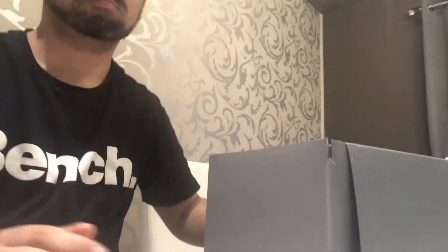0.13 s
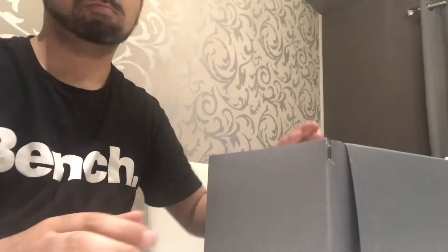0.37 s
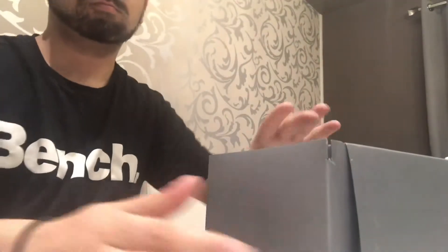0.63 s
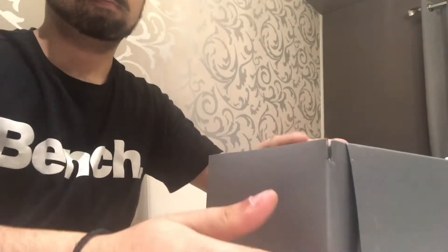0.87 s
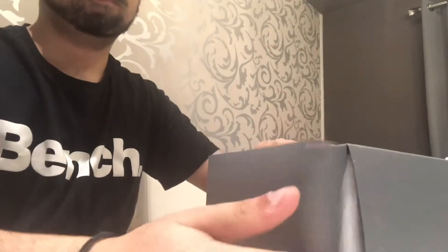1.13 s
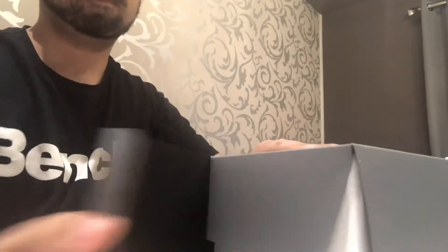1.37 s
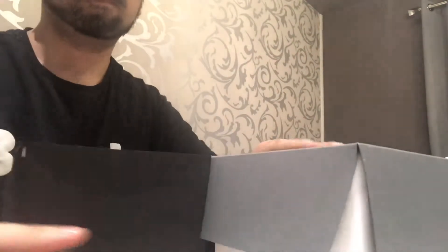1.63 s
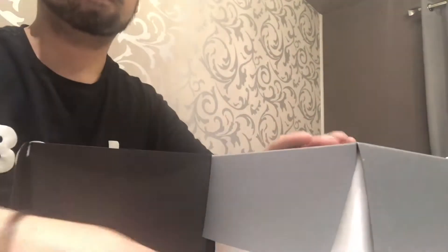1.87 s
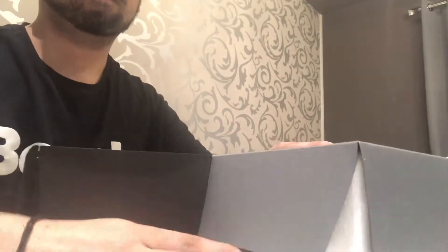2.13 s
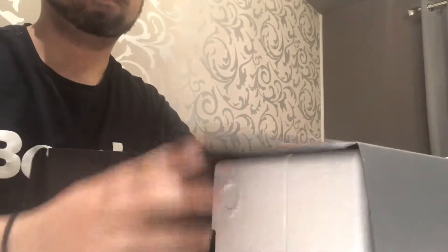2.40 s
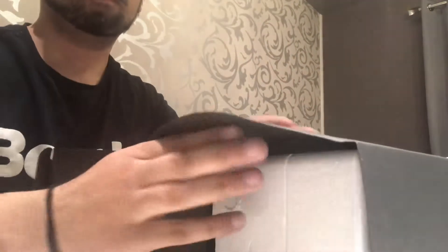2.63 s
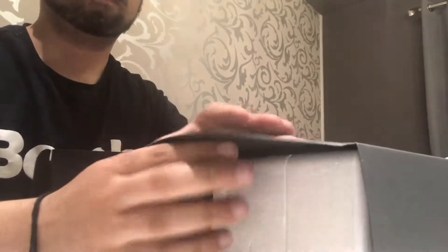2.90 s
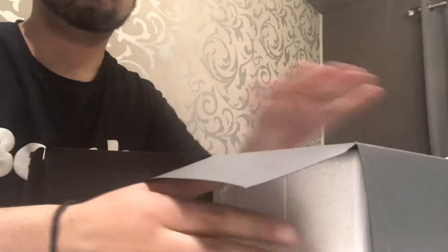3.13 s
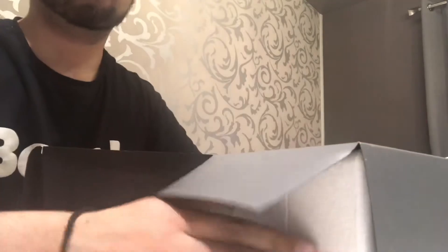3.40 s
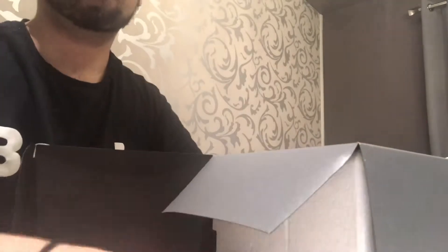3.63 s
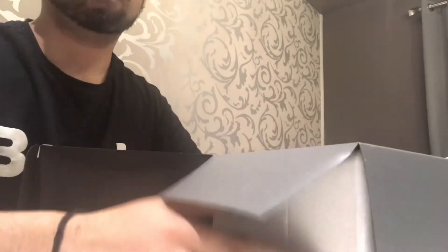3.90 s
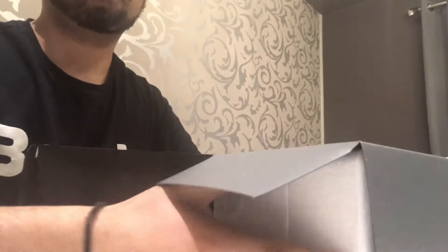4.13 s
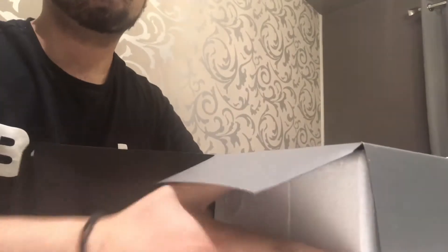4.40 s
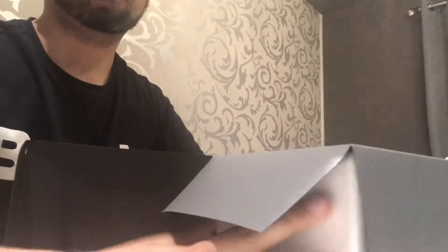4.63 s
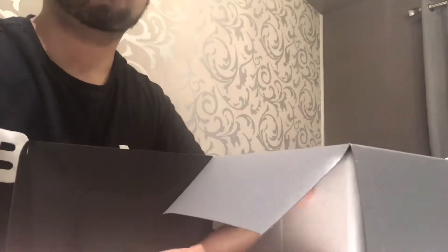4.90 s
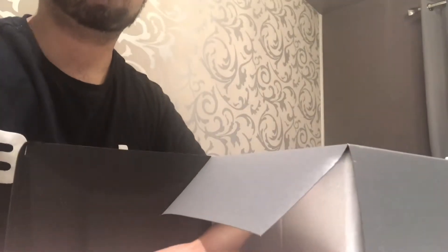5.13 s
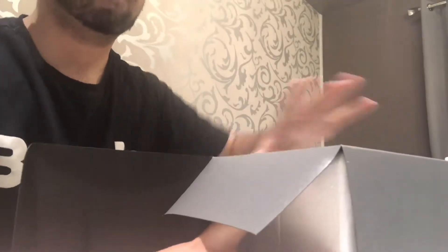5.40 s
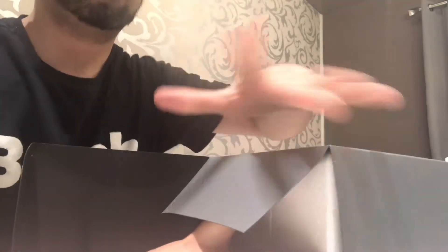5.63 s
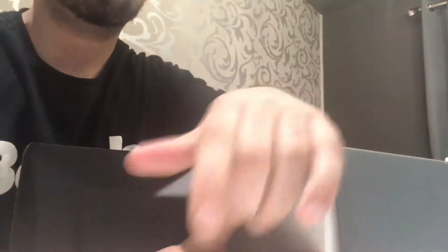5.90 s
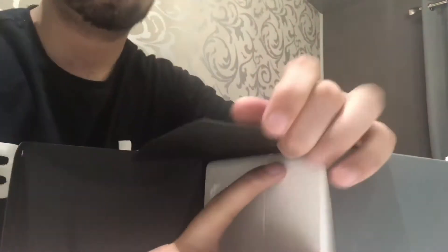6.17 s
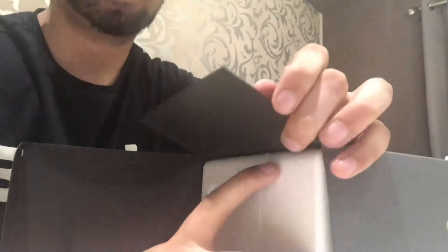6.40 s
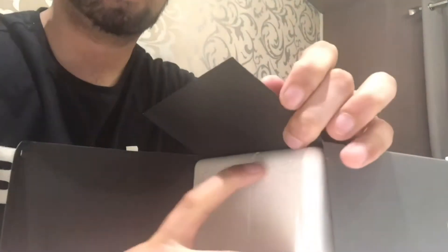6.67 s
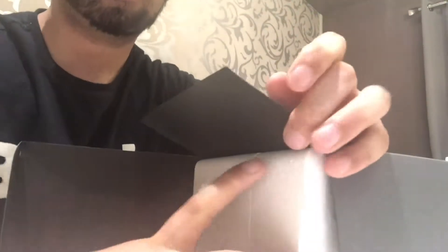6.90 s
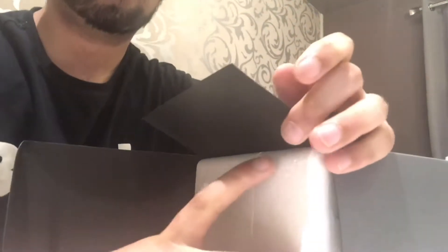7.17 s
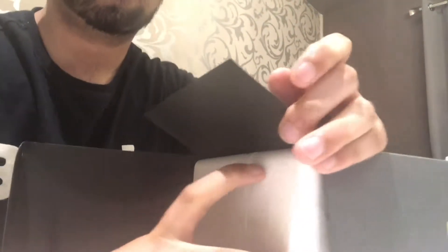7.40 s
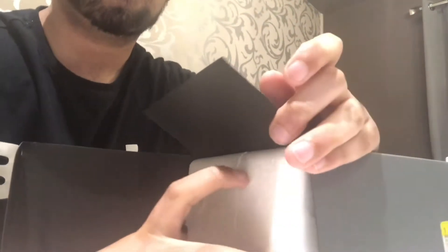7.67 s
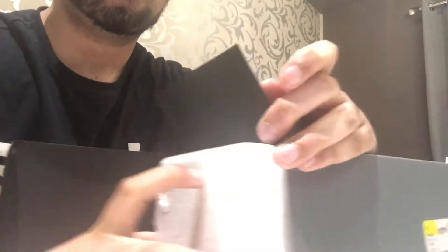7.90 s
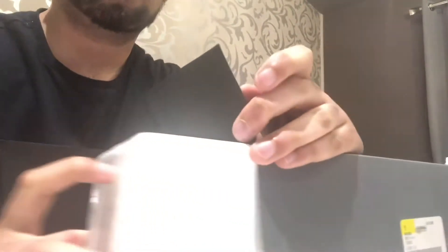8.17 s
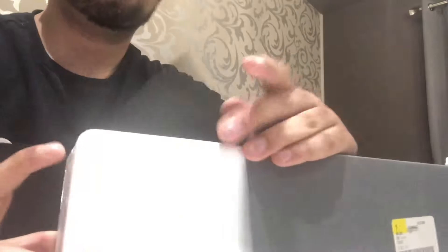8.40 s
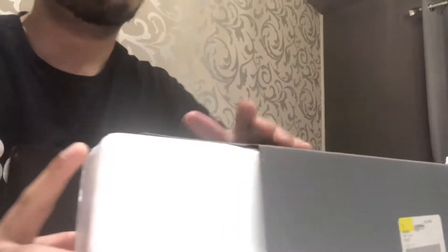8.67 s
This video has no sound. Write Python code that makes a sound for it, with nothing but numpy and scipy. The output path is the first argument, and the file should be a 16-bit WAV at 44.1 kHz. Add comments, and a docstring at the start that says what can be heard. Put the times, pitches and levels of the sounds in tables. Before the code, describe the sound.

Dry, close indoor handling of a stiff carton: skin and card rub in grainy strokes, panels thump and knock hollowly, edges squeak briefly. Midway a quiet run of creaky ticks leads to one bright, loud snap. Vigorous scuffing follows, then foam packing is pulled out in a sustained airy scrape, ending with a small knock and a fading rustle. Faint steady room air and a short room tail lie behind.

```python
"""A quiet room: hands open the flaps of a cardboard box and slide a foam block out, close to one microphone.
Skin, card and foam rub in dense random grains that hiss and shake the resonant box panels.
Knocks ring the panels after a falling chirp; snaps and creaks are short noise bursts; dragged edges squeak.
A short room tail and steady air noise lie behind; a faint, thin squeal wavers before the hands land."""
import sys
import numpy as np
from scipy import signal
from scipy.fft import rfft, irfft
from scipy.io import wavfile

SR = 44100
rng = np.random.default_rng(int(sys.argv[2]) if len(sys.argv) > 2 else 0)


def voltage_ratio(level):
    """Linear amplitude factor for a level in decibels (scalar or array-like)."""
    return 10 ** (np.asarray(level, float) / 20)


def generate_wav(sig):
    """Save sig (samples, or channels by samples) to the path in sys.argv[1] as 16-bit PCM at SR."""
    pcm = np.round(np.clip(np.atleast_2d(sig).T, -1, 1) * 32767).astype(np.int16)
    wavfile.write(sys.argv[1], SR, pcm)


N = 387638


def rms_one(x):
    """Scale to rms 1."""
    return x / np.sqrt(np.mean(x ** 2) + 1e-20)


def in_time(rows):
    """Columns of a table as curves over the samples."""
    time_s, *columns = np.transpose(rows)
    return [np.interp(np.arange(N) / SR, time_s, c) for c in columns]


def at_hz(points, hz):
    """Read a spectrum on a log-frequency axis."""
    point_hz, level_db = np.transpose(points)
    return np.interp(np.log(hz), np.log(point_hz), level_db)


def drift(rate_hz):
    """Smooth random curve of rms 1: noise through a double low-pass at SR / 20."""
    r = np.exp(-40 * np.pi * rate_hz / SR)
    noise = rng.standard_normal(N // 20 + 2002)
    slow = signal.lfilter([1], [1, -2 * r, r * r], noise)[2000:]
    return np.interp(np.arange(N) / 20, np.arange(len(slow)), rms_one(slow))


def ring(x, hz, t60_s):
    """Two-pole resonator: a unit click starts a decaying sine of height 1."""
    r, w = voltage_ratio(-60 / (t60_s * SR)), 2 * np.pi * hz / SR
    return signal.lfilter([0, np.sin(w)], [1, -2 * r * np.cos(w), r * r], x + 1e-18)


def band_limit(x, order, hz, kind):
    """Butterworth filter."""
    return signal.sosfilt(signal.butter(order, hz, kind, fs=SR, output="sos"), x)


def grains(per_s, spread_db):
    """Tiny slips of random size at random moments; rms 1."""
    sizes = voltage_ratio(spread_db * np.minimum(rng.exponential(1, N), 5)) * rng.standard_normal(N)
    return rms_one(sizes * (rng.random(N) < per_s / SR))


def coloured(sources, spectrum, lift_db, patchy_db):
    """Flickering third-octave bands of two alternating sources; lift_db is reached at 12 kHz from 0 at 3 kHz."""
    edges_hz = 25 * 2 ** np.arange(0, 9.5, 1 / 3)
    out = 0
    for k, (low, high) in enumerate(zip(edges_hz, edges_hz[1:])):
        hz = np.sqrt(low * high)
        band = band_limit(sources[k % 2], 2, [low, high], "band")
        treble = max(np.log2(hz / 3000) / 2, 0)
        out = out + band * voltage_ratio(at_hz(spectrum, hz) + patchy_db * drift(13.5) + lift_db * treble)
    return out


# hands, flaps and foam slide along the card: (top speed at [s], speeding up [s], slowing down [s],
# hiss [dB], top-octave lift [dB], panels [dB])
SLIDES = [(1.40, 0.13, 0.19, -51, -0.5, -50.5), (1.88, 0.16, 0.51, -50.5, 6.5, -83),
          (2.60, 0.23, 0.19, -47.5, 2.5, -44.5), (2.93, 0.45, 0.23, -61.5, 5, -61),
          (3.30, 0.26, 0.058, -49.5, 4, -59), (3.58, 0.42, 0.17, -53, 4.5, -51.5),
          (3.84, 0.11, 0.19, -48.5, 12, -58), (4.18, 0.21, 0.13, -47, 4.5, -48.5),
          (4.42, 0.09, 0.58, -49, 11.5, -51.5), (4.62, 0.21, 0.5, -60, 16.5, -69),
          (4.84, 0.037, 0.093, -52.5, 4, -78), (5.03, 0.1, 0.16, -52, 2, -54.5),
          (5.25, 0.16, 0.14, -54.5, 4.5, -58), (5.50, 0.54, 0.075, -63, -2, -49.5),
          (5.95, 0.12, 0.14, -50.5, 9.5, -50), (6.22, 0.085, 0.12, -48, 2, -52.5),
          (6.44, 0.12, 0.076, -45.5, -0.5, -47.5), (6.68, 0.25, 0.18, -41, 2.5, -46),
          (7.03, 0.094, 0.12, -47, 10, -50.5), (7.188, 0.04, 0.016, -44.5, 2, -47),
          (7.30, 0.49, 0.15, -75, -7, -52.5), (7.55, 0.13, 0.057, -47.5, 2, -48),
          (8.68, 0.31, 0.18, -50, 5, -54.5)]
# brushes of a finger or an edge: (top speed at [s], slowing down [s], hiss [dB], top-octave lift [dB],
# panels [dB])
BRUSHES = [(0.876, 0.071, -53.5, -0.5, -55.5), (1.014, 0.016, -52, -5, -73),
           (1.193, 0.047, -44.5, -1.5, -48), (1.245, 0.036, -45, 0.5, -42),
           (1.637, 0.084, -53.5, -0.5, -50), (1.93, 0.057, -45.5, 0.5, -42), (2.114, 0.043, -49.5, 4, -47),
           (2.198, 0.03, -53, 9, -66), (2.323, 0.027, -51, 5, -59), (2.414, 0.021, -46.5, 5, -47),
           (2.819, 0.046, -61.5, 6.5, -45), (4.032, 0.15, -52, -16, -44), (4.717, 0.049, -44, 6, -39.5),
           (5.561, 0.043, -60, 8, -46), (6.089, 0.055, -44.5, 7.5, -50), (6.85, 0.094, -51.5, 3.5, -47.5),
           (7.503, 0.0057, -34, -1, -46), (8.50, 0.081, -56, -8, -46)]
# the foam block is drawn out in one pull: (time [s], hiss [dB])
FOAM_PULL = [(7.68, -69), (7.716, -50), (7.794, -40), (8.08, -36.5), (8.328, -37.5), (8.386, -42),
             (8.44, -66)]
FOAM_LIFT_DB, FOAM_PANELS_RE_HISS_DB = 8.5, -10.5
HANDS_ON_S = 0.85
RESTING_HISS_DB, RESTING_LIFT_DB, RESTING_PANELS_DB = -64, 2, -60   # hands never lie quite still
BRUSH_RISE_MAX_S = 0.03
LIFT_DB_PER_HISS_DB = 0.26   # slower is duller


def strokes():
    """Quarter-sine speed of each stroke sets hiss, brightness and panel shaking; powers add."""
    t = np.arange(0, N / SR + .004, .002)
    brushes = [(s, min(BRUSH_RISE_MAX_S, fall), fall, *rest) for s, fall, *rest in BRUSHES]
    s, rise_s, fall_s, hiss_db, lift_db, panels_db = np.array(list(SLIDES) + brushes).T[:, :, None]
    before, after = (s - t) / np.maximum(rise_s, 1e-3), (t - s) / np.maximum(fall_s, 1e-3)
    away = np.where(t < s, before, after)
    speed = np.cos(np.pi / 2 * np.minimum(away, 1)) + 1e-3
    on = (t > HANDS_ON_S) + 1e-4

    hiss = (voltage_ratio(hiss_db) * speed) ** 2
    resting = voltage_ratio(RESTING_HISS_DB) ** 2
    foam = voltage_ratio(np.interp(t, *np.transpose(FOAM_PULL), left=-np.inf, right=-np.inf)) ** 2
    total = hiss.sum(axis=0) + resting + foam

    lift_db = lift_db + LIFT_DB_PER_HISS_DB * 20 * np.log10(speed)
    lift_sum = (hiss * lift_db).sum(axis=0) + resting * RESTING_LIFT_DB + foam * FOAM_LIFT_DB
    top_db = lift_sum / total   # power-weighted mean

    panels = ((voltage_ratio(panels_db) * speed) ** 2 * (away < 1)).sum(axis=0)
    panels = panels + voltage_ratio(RESTING_PANELS_DB) ** 2 + foam * voltage_ratio(FOAM_PANELS_RE_HISS_DB) ** 2
    return in_time(np.transpose([t, 10 * np.log10(total * on), top_db, 10 * np.log10(panels * on)]))


# box panels and cavity when struck: (mode [Hz], level [dB], t60 [s])
BOX = [(66, -15, 0.049), (140, -5, 0.12), (205, -1, 0.094), (267, 5, 0.05), (390.5, 14.5, 0.032),
       (459, 16.5, 0.015), (585, 20.5, 0.014), (766, 18, 0.012), (992, 12, 0.039), (1760, 9.5, 0.011),
       (2680, 7, 0.046)]
# relative spectrum of friction: (frequency [Hz], density [dB per Hz])
FRICTION = [(290, -30), (500, -7), (1460, -2), (2420, -1.5), (4300, -4), (14900, -18), (15800, -12)]
CARD_RE_HISS_DB, CARD_DB_PER_LIFT_DB = -8, 0.97   # dull card-on-card strokes ring most
FLAPS_DONE_S, FLAPS_DONE_LOSS_DB = 4.7, 4   # once the flaps are done, strokes ring the card less
CRACKLES_PER_S, CRACKLE_DB = 200, -6.5   # relative to the fine grains
RUMBLE_DB, RUMBLE_FOLLOWS, RUMBLE_HZ = -62.5, 0.4, 98.5   # at panels -52 dB; share of their swing


def rubbing():
    """Fine grains hiss, also through patch and card resonances; coarser slips drive the panel modes."""
    hiss_db, top_db, panels_db = strokes()
    # the grip catches and lets go, most in slow, soft strokes
    stutter_db = np.clip((-42 - hiss_db) / 4, .8, 1.7) * drift(25)

    fine = [grains(12000, spread_db=0.0) for k in range(2)]
    patch = sum(voltage_ratio(7 * drift(6)) * rms_one(ring(fine[0], hz, .018))
                for hz in np.geomspace(1000, 13000, 24))
    # the upper card modes sing along, damped
    card = sum(voltage_ratio(db / 2 + 5.8 * drift(2.1)) * rms_one(ring(fine[1], hz, 0.32 * t60))
               for hz, db, t60 in BOX if hz > 900)
    flaps_done = np.arange(N) > FLAPS_DONE_S * SR
    card_db = CARD_RE_HISS_DB - CARD_DB_PER_LIFT_DB * top_db - FLAPS_DONE_LOSS_DB * flaps_done
    crackle = voltage_ratio(CRACKLE_DB) * grains(CRACKLES_PER_S, spread_db=-1.0)   # dense and fine
    resonant = voltage_ratio(card_db) * rms_one(card) + voltage_ratio(-12) * rms_one(patch)
    hiss = coloured([f + crackle + resonant for f in fine], FRICTION, top_db, patchy_db=1.25)
    hiss = hiss / np.std(band_limit(hiss, 4, [1500, 6000], "band"))

    coarse = signal.lfilter([1], [1, -.9], grains(1500, spread_db=1.8))
    panels = sum(voltage_ratio(db + 3 * drift(4)) * ring(coarse, hz, .8 * t60) for hz, db, t60 in BOX if hz > 100)
    panels = rms_one(band_limit(panels, 2, 160, "high"))
    # the box rocks on the table
    rumble_db = RUMBLE_DB + RUMBLE_FOLLOWS * (panels_db + 52) + 2.9 * drift(3.6)
    rumble = voltage_ratio(rumble_db) * rms_one(ring(coarse, RUMBLE_HZ, 0.054))
    shaking = voltage_ratio(panels_db + stutter_db + 2.23 * drift(5.8)) * panels
    return rumble + voltage_ratio(hiss_db + stutter_db) * hiss + shaking


def favour_db(mode_hz, spot_hz):
    """Modes near the pitch that the struck spot favours ring louder."""
    return 18 * np.exp(-(np.log2(mode_hz / spot_hz) / 0.44) ** 2)


def card_spreading(hz):
    """Bending waves in card carry highs faster: delay falls as one over root of pitch."""
    return np.exp(-2j * np.pi * (.26 * np.sqrt(hz) - .001 * hz))


# fingers and flaps knock the box: (time [s], peak [dB], contact hardness [0-1.2], favoured pitch [Hz])
KNOCKS = [(1.246, -17, 1.05, 992), (1.904, -27.5, 1, 1000), (2.113, -31, 0.17, 320),
          (2.797, -32, 0.26, 427), (2.836, -36, 0.07, 212), (3.036, -34, 1, 302), (3.296, -33, 0.4, 555),
          (3.77, -35.5, 1.1, 496), (3.978, -33.5, 0.7, 560), (4.015, -24.5, 1, 585),
          (4.6582, -19.5, 0.68, 354), (4.743, -24, 0.9, 382), (5.977, -33, 0.53, 315),
          (6.342, -28, 0.4, 460), (6.705, -26, 1.19, 895), (7.028, -21, 1.1, 485), (7.185, -24.5, 0.6, 302),
          (7.459, -27, 1.19, 620), (7.481, -28, 1.19, 730), (8.165, -25.5, 1, 395), (8.515, -29, 1.1, 804)]


def knocks():
    """Each blow arrives as a falling chirp, then the panels ring; harder contacts are brighter."""
    out, size = np.zeros(N + 16384), 16384
    hz = np.fft.rfftfreq(size, 1 / SR) + 1
    click = np.arange(size) == 0
    luck_db = rng.normal(0, 2.5, (len(KNOCKS), len(BOX)))
    for (s, db, hard, spot_hz), gains_db in zip(KNOCKS, luck_db):
        gains_db = gains_db + favour_db(np.array(BOX)[:, 0], spot_hz)
        contact_hz = 150 * 2 ** (5 * np.clip(hard, 0, 1.2))
        rings = sum(voltage_ratio(mode_db + g) * ring(click, mode_hz, t60)
                    for (mode_hz, mode_db, t60), g in zip(BOX[2:], gains_db[2:]))
        soft = 1 / (1 + 1j * hz / contact_hz) ** 2 * hz / (hz + 120)
        blow = irfft((rfft(rings) * voltage_ratio(12.0) + 1) * card_spreading(hz) * soft, size)
        at = round(s * SR)
        out[at:at + size] += voltage_ratio(db) * blow / np.abs(blow).max()
    return out[:N]


# the whole box is pushed: (time [s], rms of first 50 ms [dB], favoured pitch [Hz])
THUDS = [(1.661, -50.5, 140), (1.907, -41, 66), (3.042, -51, 125), (4.66, -49, 111), (6.333, -43.5, 140)]


def thuds():
    """A push rings the two lowest box modes, softened."""
    out, size = np.zeros(N + 16384), 16384
    hz = np.fft.rfftfreq(size, 1 / SR) + 1
    click = np.arange(size) == 0
    for s, db, push_hz in THUDS:
        rings = sum(voltage_ratio(mode_db + favour_db(mode_hz, push_hz)) * ring(click, mode_hz, t60)
                    for mode_hz, mode_db, t60 in BOX[:2])
        soft = 1 / (1 + 1j * hz / 110) ** 2 / (1 + (50 / hz) ** 4)
        thud = irfft(rfft(rings) * card_spreading(hz) * soft, size)
        at = round(s * SR)
        out[at:at + size] += voltage_ratio(db) * thud / np.std(thud[:SR // 20])
    return out[:N]


# creases and beads let go: (time [s], peak [dB], brightness [dB per octave], length scale [s],
# strongest pitch [Hz])
SNAPS = [(1.196, -29, -3.5, 0.0068, 2620), (1.248, -14.5, -7, 0.0061, 2600), (1.527, -33, -8, 0.0083, 2850),
         (1.893, -15.5, -2, 0.0019, 4200), (1.907, -24, -7, 0.007, 2420), (2.092, -26, -1.5, 0.0082, 2520),
         (3.666, -22.5, -2, 0.0021, 5200), (4.016, -23.5, -7.5, 0.0038, 2640),
         (4.745, -27.5, -1, 0.0075, 2500), (5.911, -8.5, 2, 0.0027, 3940), (6.722, -23, -4.5, 0.0016, 930),
         (6.89, -23, -3.5, 0.0033, 5060), (7.18, -27.5, -1, 0.015, 1190), (7.47, -23, -14, 0.00078, 2800),
         (8.473, -27.5, -6, 0.0078, 1440)]
# a bent flap creaks in short ticks: (time [s], peak [dB], brightness [dB per octave])
CREAKS = [(0.926, -36.5, -9.5), (1.575, -35, -8), (5.232, -33, -9), (5.25, -35, -8), (5.29, -32.5, -9.5),
          (5.3767, -34, -7), (5.407, -37, -6.5), (5.451, -32.5, -11), (5.4735, -31.5, -7.5),
          (5.491, -46, -9), (5.504, -37, -9.5), (5.5518, -27.5, -9), (5.569, -35.5, -8.5), (5.582, -35, -5),
          (5.6107, -34, -7.5), (5.6795, -46.5, -1), (5.691, -50.5, -5.5), (5.7154, -34.5, -11.5),
          (5.733, -49.5, -7), (5.8023, -42, -8), (6.142, -35, -7), (6.984, -31, -10), (7.361, -32, -8),
          (7.373, -38, -9.5), (7.459, -22, -8), (7.482, -29, -1), (8.549, -28, -3)]
CREAK_LENGTH_SCALE_S, CREAK_HZ = 0.0031, 9100


def snaps():
    """Brief noise bursts, dull or bright; the fold that lets go has a pitch of its own."""
    out, size = np.zeros(N + 4096), 4096
    t, hz = np.arange(size) / SR, np.fft.rfftfreq(size, 1 / SR) + 1
    events = list(SNAPS) + [(*creak, CREAK_LENGTH_SCALE_S, CREAK_HZ) for creak in CREAKS]
    noises = rng.standard_normal((len(events), size))
    for (s, db, tilt_db, length_s, peak_hz), noise in zip(events, noises):
        age = t / max(0.45 * length_s, 1e-4)
        burst = noise * age ** 0.68 * np.exp(-age)
        slope = voltage_ratio(tilt_db * np.log2(np.clip(hz, 1000, 14000) / 3000))
        hump = voltage_ratio(8.5 * np.exp(-(np.log2(hz / peak_hz) / 0.75) ** 2)) / (1 + (hz / 15000) ** 8)
        burst = irfft(rfft(burst) * slope * hump * hz / (hz + 700), size)
        at = round(s * SR)
        out[at:at + size] += voltage_ratio(db) * burst / np.abs(burst).max()
    return out[:N]


# a flap edge squeaks as it drags: (time [s], rms at the height [dB])
SQUEAKS = [(1.01, -53.5), (1.1, -57), (1.66, -53), (3.58, -48)]
SQUEAK_HALF_WIDTH_S = 0.042   # to 1/e


def squeaks():
    """Coarse slips keep the highest card mode singing during each drag."""
    t, (hz, _, t60_s) = np.arange(0, N, 64) / SR, BOX[-1]
    drag = sum(voltage_ratio(db) * np.exp(-((t - s) / SQUEAK_HALF_WIDTH_S) ** 2) for s, db in SQUEAKS)
    tone = rms_one(ring(grains(900, spread_db=4.5), hz, t60_s / 2))
    return np.interp(np.arange(N) / SR, t, drag) * tone


# a very faint, thin squeal wavers before the hands land: (time [s], pitch [Hz])
SQUEAL = [(0.065, 13650), (0.14, 12750), (0.23, 12600), (0.32, 13700), (0.38, 13150), (0.48, 13650),
          (0.545, 13050)]
SQUEAL_DB = -79   # peak, before flicker
UPPER_RATIO, UPPER_DB, UPPER_DB_PER_KHZ, UPPER_ENDS_S = 1.105, -73, 20, 0.41   # level at highest pitch


def squeal():
    """Two thin gliding tones flicker in strength; the upper joins when the pitch is high."""
    hz, = in_time(SQUEAL)
    t, phase = np.arange(N) / SR, 2 * np.pi * np.cumsum(hz) / SR
    upper_db = UPPER_DB + UPPER_DB_PER_KHZ * (hz - hz.max()) / 1000
    upper = voltage_ratio(upper_db) * (t < UPPER_ENDS_S) * np.sin(UPPER_RATIO * phase)
    lower = voltage_ratio(SQUEAL_DB) * np.sin(phase) * (t < SQUEAL[-1][0])
    return voltage_ratio(2 * drift(20)) * (lower + upper)


def room(x):
    """A dense tail of reflections from near walls and furniture, dulled by them."""
    t60_s, build_up_s, wall_cut_hz = 0.42, 0.0096, 1800
    t = np.arange(SR // 2) / SR
    tail = rng.standard_normal(len(t)) * voltage_ratio(-60 * t / t60_s) * np.minimum(t / build_up_s, 1)
    tail = band_limit(tail, 1, wall_cut_hz, "low")
    return signal.fftconvolve(x, tail / np.linalg.norm(tail))[:N]


# relative spectrum of room air: (frequency [Hz], density [dB per Hz])
QUIET = [(25, -49), (38, -3), (69, -12), (327, -12), (759, -25), (3500, -32.5), (13000, -40)]
QUIET_RMS_DB = -65.5


def room_air():
    """Steady noise in gently flickering bands."""
    noise = rng.standard_normal((2, N))
    return voltage_ratio(QUIET_RMS_DB) * rms_one(coloured(noise, QUIET, 0, patchy_db=2.5))


def scene():
    """One microphone feeds both channels."""
    box = rubbing() + knocks() + thuds() + snaps() + squeaks()
    room_db = -19.5
    return np.tile(box + voltage_ratio(room_db) * room(box) + room_air() + squeal(), (2, 1))


def low_pass(x):
    """Removes everything above the highest recorded frequency."""
    return signal.sosfilt(signal.butter(12, 17060, fs=SR, output="sos"), x)


def record(dry):
    """Filters cut the deep bass and the very top."""
    cut = band_limit(dry, 4, 42, "high")
    cut = signal.sosfilt(signal.cheby2(12, 40, 16100, fs=SR, output="sos"), cut)
    return low_pass(cut)


dry = scene()
out = record(dry)
generate_wav(out)
```